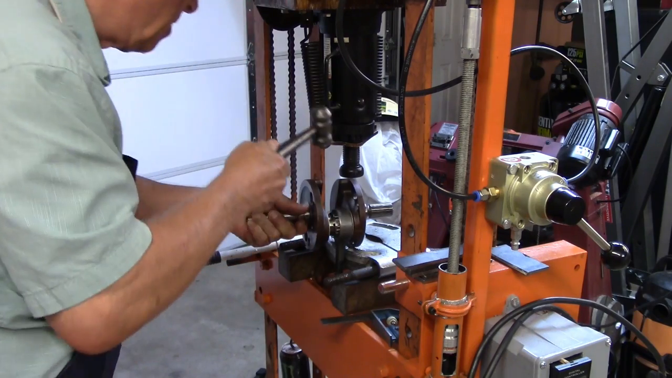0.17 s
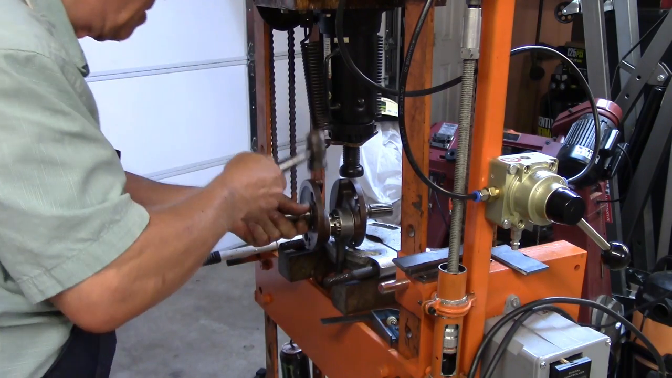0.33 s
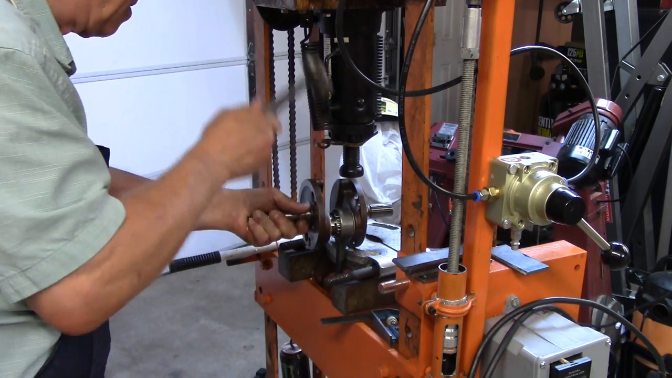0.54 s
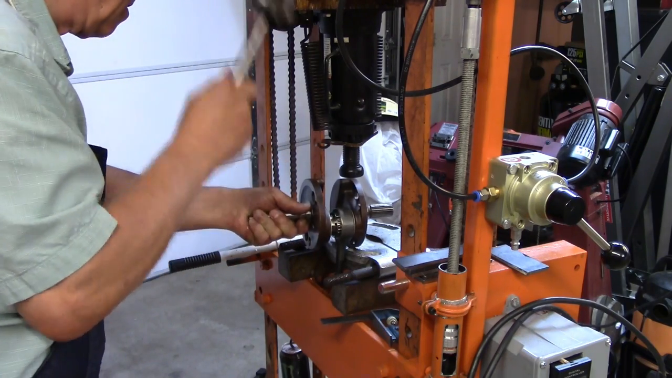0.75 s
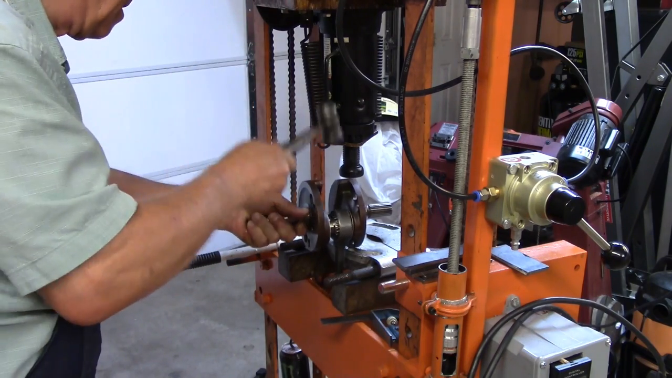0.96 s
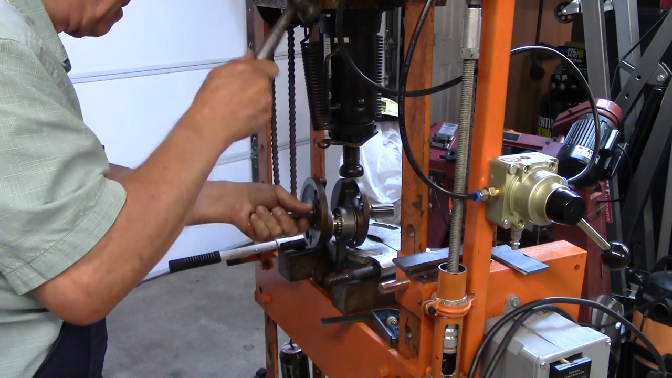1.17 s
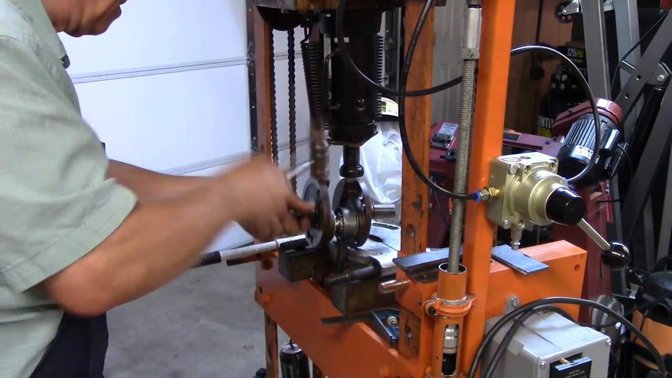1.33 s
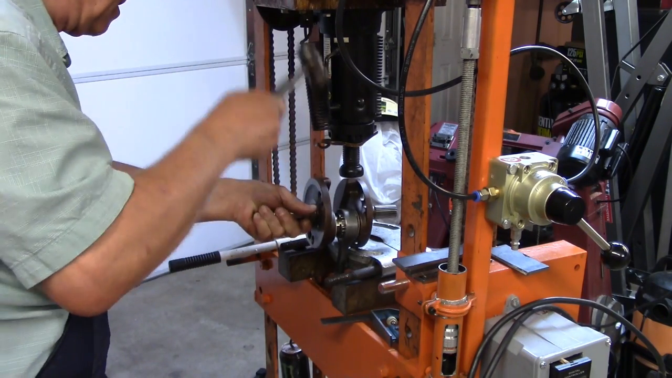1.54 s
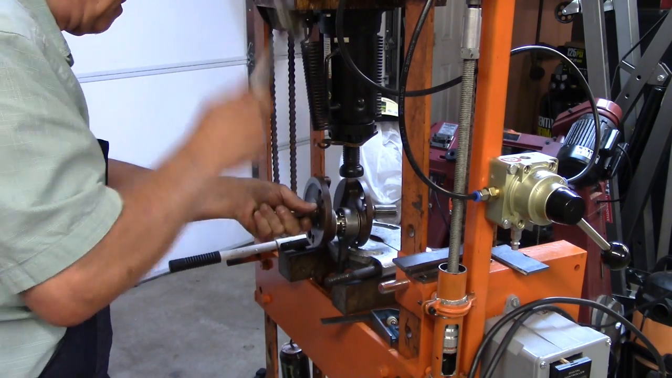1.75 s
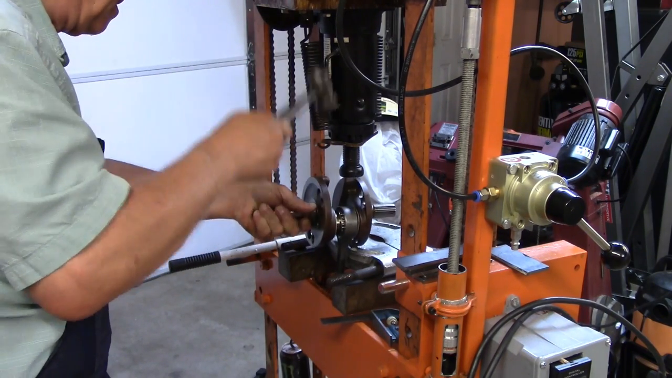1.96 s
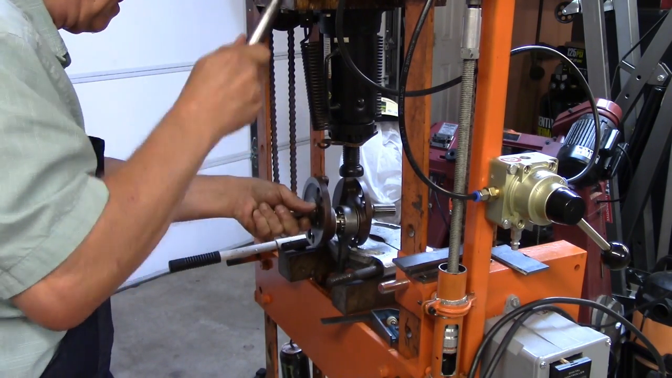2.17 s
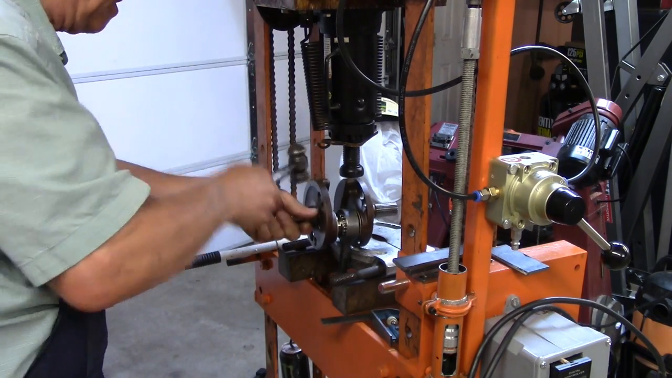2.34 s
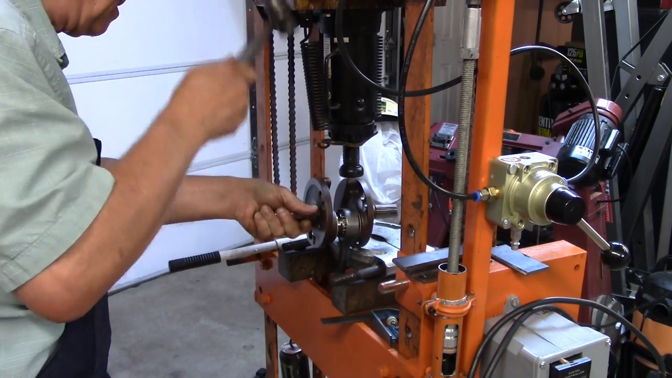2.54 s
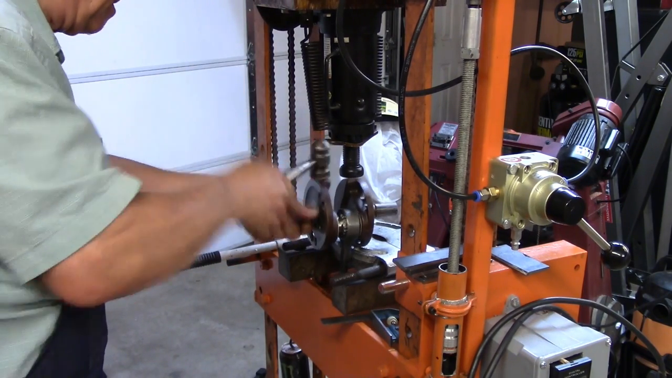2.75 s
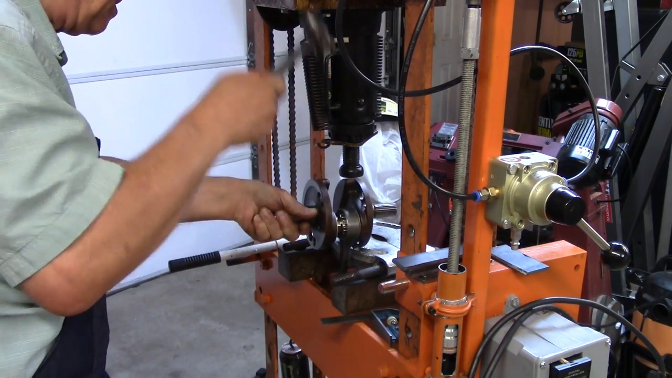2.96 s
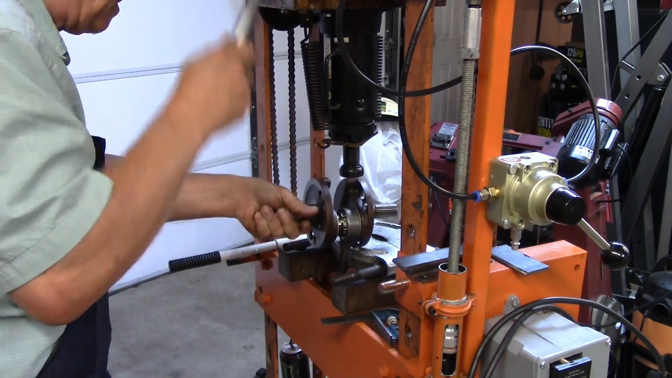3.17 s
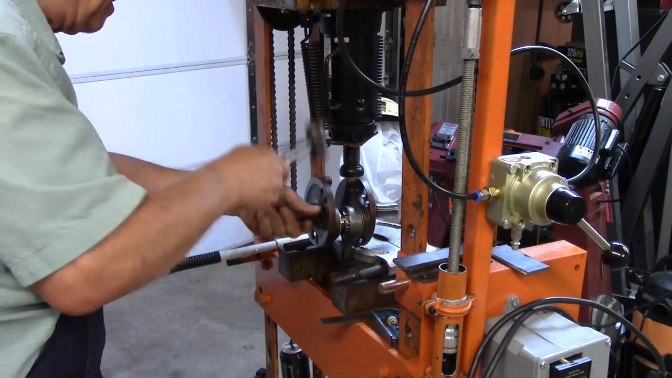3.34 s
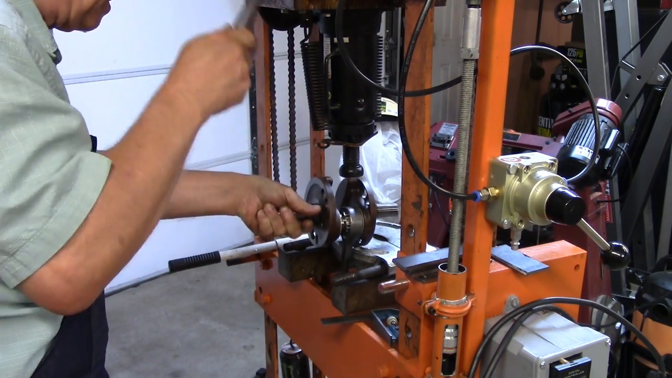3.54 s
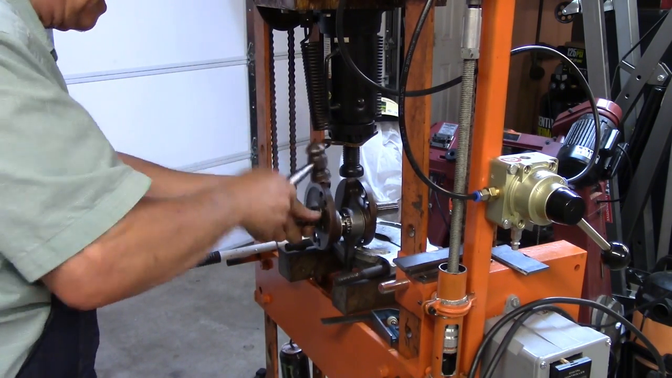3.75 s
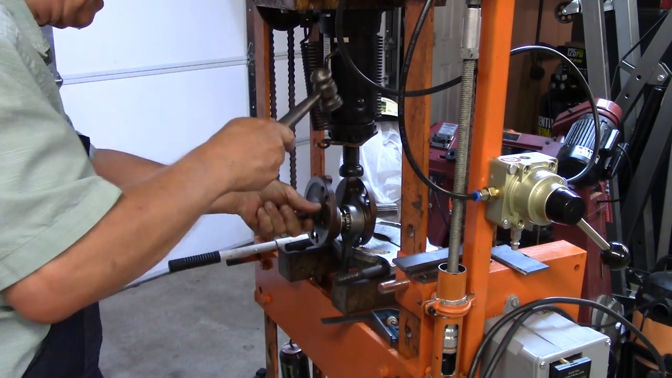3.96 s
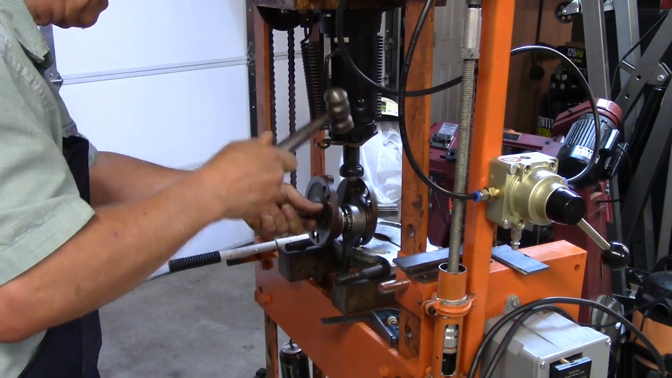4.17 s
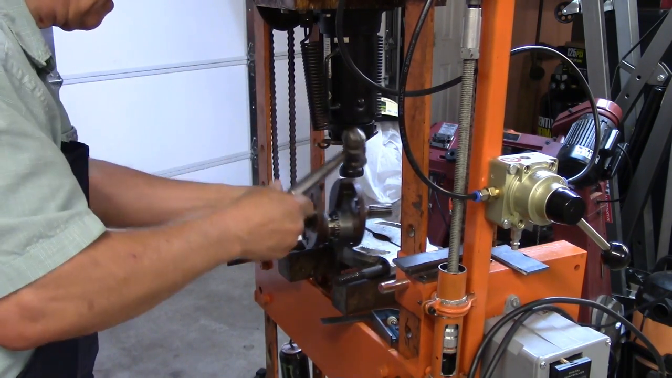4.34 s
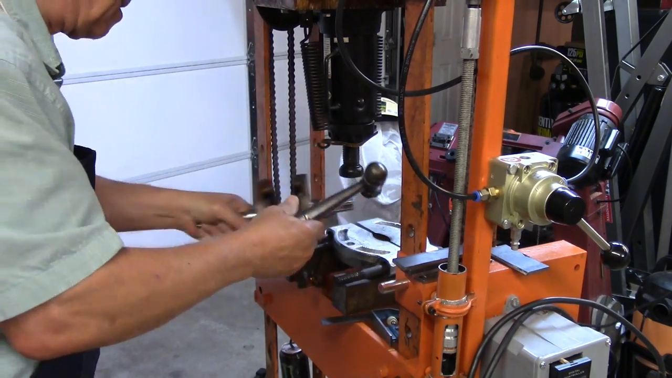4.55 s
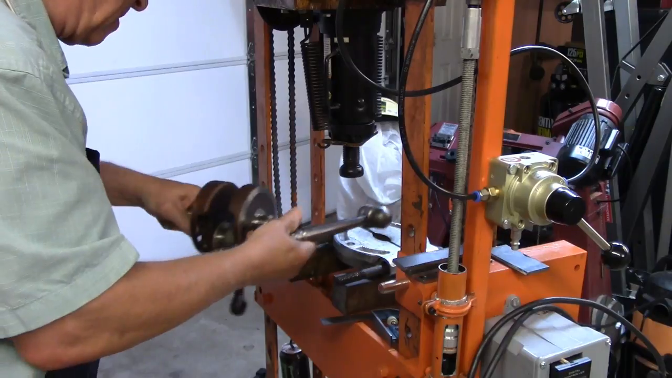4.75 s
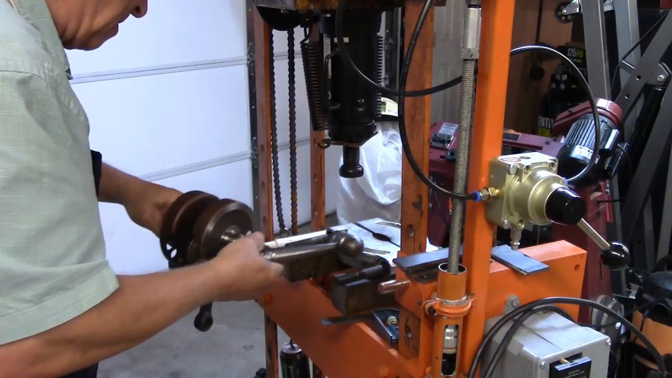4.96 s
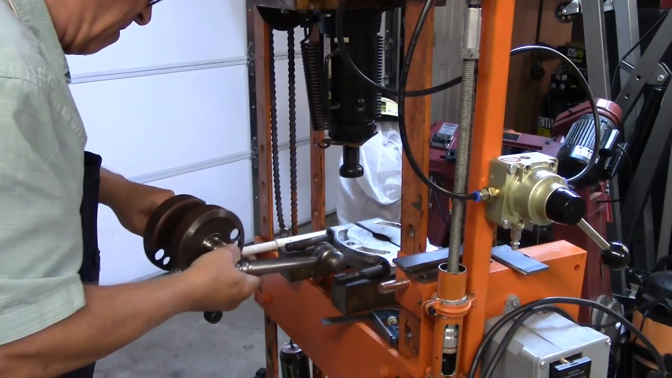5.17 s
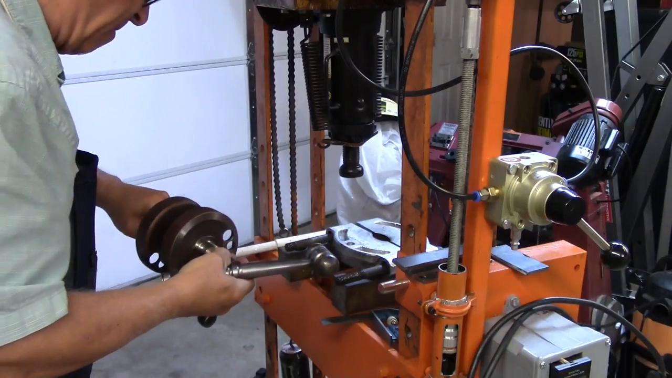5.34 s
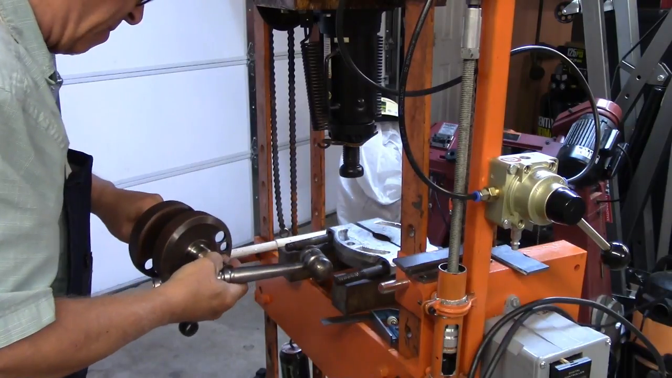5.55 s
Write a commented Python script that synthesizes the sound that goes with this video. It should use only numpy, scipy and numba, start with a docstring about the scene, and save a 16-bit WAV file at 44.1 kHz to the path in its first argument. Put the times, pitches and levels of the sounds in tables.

```python
"""A motor and its fan drone in a garage, made from coloured noise and wavering low tones.
A steel hammer taps a flywheel held in a press, bounces once, then strikes it seven full blows.
Each contact is a noise burst plus ringing steel, which the walls throw back for about half a second.
Later steel slides off the press with a faint hiss of noise, and the lifted parts clink.
A camera's gain control reacts a few milliseconds late throughout, so the loud starts can clip."""
import sys
import numpy as np
from scipy import signal
from scipy.fft import rfft, irfft
from scipy.io import wavfile
from scipy.ndimage import uniform_filter1d
from numba import njit

SR = 44100
rng = np.random.default_rng(int(sys.argv[2]) if len(sys.argv) > 2 else 0)


def inscribe(sig):
    """Save sig as 16-bit PCM at rate SR to the path in sys.argv[1].

    A 1-D sig is mono; a 2-D sig holds one channel per row.
    Samples are clipped to [-1, 1] before scaling.
    """
    pcm = np.round(np.clip(np.atleast_2d(sig).T, -1, 1) * 32767)
    wavfile.write(sys.argv[1], SR, pcm.astype(np.int16))


N = 247004  # length in samples

# Colour of the fan noise. Each row: pitch in Hz, relative level in dB per Hz.
FAN_COLOUR = [(20, -49), (42, -26), (60, -11), (80, -28.5), (120, -15.5), (190, -11.5), (250, 0), (350, -3),
              (520, -4), (900, -10.5), (2000, -18.5), (5000, -30), (9000, -39), (15500, -52.5)]
# Low tones of the motor. Each row: pitch in Hz, middle level in dB rms.
MOTOR_TONES = [(57.5, -59), (115, -58), (172, -54.5), (232, -66), (345, -48)]
# Stereo width of the drone. Each row: pitch in Hz, gain of the side signal in dB.
DRONE_WIDTH = [(60, -16.5), (180, -19), (550, -22.5), (1650, -17.5), (4970, -13.5), (15000, -8)]
# Light aiming tap and its bounce. Each row: start in seconds, strength in dB.
TAPS = [(0.4478, -3.5), (.4790, -11.5)]
# Full blows. Each row: start in seconds, strength in dB, landing spot from 0 (flat of the shaft) to 1 (near the rim).
BLOWS = [(.9270, 15, 0.037), (1.4240, 14.5, 0.026), (1.9043, 16, 0.55), (2.3743, 16, 0.87),
         (2.8510, 15.5, 0.25), (3.3343, 16, 0.71), (3.8128, 16.5, 0.83)]
# The lifted parts touch. The one row: start in seconds, strength in dB.
CLINK = (4.9795, -17.5)
# Ringing of flywheel, shaft and hammer, in groups that a blow excites together.
# Each row in a group: pitch in Hz, relative level in dB, time to fall by 60 dB in seconds.
RING_GROUPS = [
    [(1055, -10, .2)],
    [(1540, -9, .18), (1612, -10, .15), (1810, -6, .08), (1890, -8, .12)],
    [(3002, -3, .3), (3072, -9, .2)],
    [(2800, -11, .15), (3600, -3, .15), (3630, -4, .13), (3696, -3, .24), (3735, -3, .12), (3785, -2, .2),
     (3830, -4, .15)],
    [(4050, -7, .13), (4103, -3, .28), (4137, -4, .3)],
    [(4958, -6, .6)],
    [(5239, -8, .33)],
    [(5514, -8, .12), (5600, -7, .18), (5880, -10, .22), (6015, -9, .15)],
    [(6590, -10, .22), (6800, -12, .15), (11130, -21, .2), (11300, -21, .22)],
    [(7180, -17, .2), (7965, -16, .2), (8470, -16, .25), (8487, -17, .33), (9990, -18, .2)],
    [(11502, -16, .3), (12600, -23, .2), (13250, -28, .15), (13506, -22, .18), (14290, -24, .1)],
    [(11740, -24, .4), (13628, -32, 1.5)],
]
# How strongly the ring groups answer each kind of contact. Each entry: gain of one group in dB, in group order.
ON_FLAT = [-9.5, -7.5, -18, 1, -10.5, -10.5, 1, -9, -31, -2, 9.5, -10.5]
NEAR_RIM = [-7.5, -4.5, -3.5, -2, 0, 2.5, -0.5, -0.5, 4, 2, -1, -2.5]
TAPPED = [-4, -1.5, -27, -8.5, 2, -6, -5, -12, 3, -12, -11, -17]
CLINKED = [10.5, 4, -26, -27, -45, -33, -6, -28, -7, -4, -9, -32]
# Colour of the contact burst. Each row: pitch in Hz, relative level in dB per Hz.
CRACK_COLOUR = [(180, -52), (300, -19.5), (450, -14), (700, -14), (1050, -10), (1700, -2), (2400, -2.5),
                (3300, 1), (4500, -4), (5400, 1.5), (7500, -6), (11500, -9), (13800, -21.5), (15800, -22.5)]
# Echo of the garage. Each row: pitch in Hz, time to fall by 60 dB in seconds.
GARAGE_DECAY = [(150, 0.58), (700, 0.47), (2000, 0.46), (4000, 0.46), (8000, 0.41), (15000, 0.23)]
# Stereo width of contacts and scrape. Each row: pitch in Hz, gain of the side signal in dB.
CONTACT_WIDTH = [(60, -15), (130, -18), (290, -30), (640, -23), (1410, -35.5), (3100, -16.5), (6820, -12.5),
                 (15000, -16.5)]
# Steel slides off the press. Each row: time in seconds, level in dB.
SCRAPE_LEVEL = [(4.45, -80), (4.6, -56), (4.72, -55), (4.85, -62), (4.95, -71)]

DRONE_DB = -38.5  # fan noise level, before its swells
# below HARD_DB, each dB lost dulls the contact above DULL_FROM_HZ
HARD_DB, DULL_DB_PER_OCTAVE, DULL_FROM_HZ = 1, 0.37, 580
ROOM_DB, CLINK_ROOM_DB = 2.14, 0  # the hand-held parts send less to the walls
CLANG_DB, CLINK_CLANG_DB = -8.0, -17  # loose parts hardly clang
EDGE_HZ = 15900  # upper limit of the final sound


def amp(db):
    """Turns dB into a plain multiplier."""
    return 10 ** (np.asarray(db) / 20)


def evened(x):
    """Scales x to an rms of 1."""
    return x / np.sqrt(np.mean(x ** 2) + 1e-20)


def read(points, hz):
    """Reads a table between its rows, along a logarithmic pitch scale."""
    f, value = np.transpose(points)
    return np.interp(np.log(hz + 1), np.log(f + 1), value)


def coloured(x, db_of):
    """Filters x by a gain in dB given as a function of frequency."""
    hz = np.fft.rfftfreq(x.shape[-1], 1 / SR)
    return irfft(rfft(x) * amp(db_of(hz)), x.shape[-1])


def wander(hz):
    """Random curve of rms 1, made of noise kept mostly below hz."""
    noise = rng.standard_normal(N)
    return evened(coloured(noise, lambda f: -40 * np.log10(1 + (f / hz) ** 2)))


def left_right(mid, side, width):
    """Sets the side signal's level by pitch, then makes left and right as mid plus and minus side."""
    side = coloured(side, lambda hz: read(width, hz))
    return np.array([mid + side, mid - side])


def drone(swell_db=.4, flutter_db=1.2, waver=.006):
    """Fan noise that swells and flutters slightly, and motor tones that waver together in pitch."""
    air = coloured(rng.standard_normal((2, N)), lambda hz: read(FAN_COLOUR, hz))
    level_db = DRONE_DB + swell_db * wander(0.83) + flutter_db * wander(30)
    air *= amp(level_db) / air[0].std()
    turns = np.cumsum(1 + waver * wander(3.6)) / SR
    for hz, db in MOTOR_TONES:
        tone = np.sin(2 * np.pi * (hz * turns + rng.random()))
        air[0] += np.sqrt(2) * amp(db + 2.65 * wander(5.4)) * tone
    return left_right(*air, DRONE_WIDTH)


def strikes():
    """Lists every contact as (start in s, strength dB, room dB, clang dB, answers of the ring groups)."""
    flat, rim = np.array(ON_FLAT), np.array(NEAR_RIM)
    taps = [(s, db, ROOM_DB, CLANG_DB, TAPPED) for s, db in TAPS]
    # the landing spot blends the two ways the steel can answer
    blows = [(s, db, ROOM_DB, CLANG_DB, flat + spot * (rim - flat)) for s, db, spot in BLOWS]
    clink = (*CLINK, CLINK_ROOM_DB, CLINK_CLANG_DB, CLINKED)
    return taps + blows + [clink]


def contact_noise(t, db, crack_t60=0.034, soft=0.38):
    """The crack of steel on steel: a noise burst that is shorter and duller for a light contact."""
    # crack_t60 is the time to fall by 60 dB, in seconds, at a strength of 18 dB
    fall_s = crack_t60 * amp(soft * (db - 18.0))
    burst = rng.standard_normal(len(t)) * amp(-60 * t / fall_s)
    # the burst keeps its scattered phases but has the smooth spectrum of a hard contact
    bumps = uniform_filter1d(abs(rfft(burst)), size=45)
    flat = irfft(rfft(burst) / bumps, len(t))
    tilt = DULL_DB_PER_OCTAVE * min(db - HARD_DB, 0)

    def colour(hz):
        """The contact's colour, tilted down at the top if it is light."""
        octaves_up = np.log2(np.maximum(hz, DULL_FROM_HZ) / DULL_FROM_HZ)
        return read(CRACK_COLOUR, hz) + tilt * octaves_up

    crack = coloured(flat, colour)
    fade = np.clip(2 - t / .06, 0, 1)  # full for 60 ms, gone at 120 ms
    return crack * fade * np.linalg.norm(burst) / np.linalg.norm(crack)


def blow(db, clang_db, answers, rings_db=-15.0, clang_share=0.21):
    """A burst of contact noise with a short clang, and the longer ringing of the steel as fading sines."""
    t = np.arange(int(1.5 * SR)) / SR
    crack = contact_noise(t, db)
    modes = [(hz, answer_db + mode_db, t60)
             for group, answer_db in zip(RING_GROUPS, answers)
             for hz, mode_db, t60 in group]
    hz, level_db, t60 = np.array(modes).T[..., None]
    tones = np.sin(2 * np.pi * (hz * t + rng.random(hz.shape)))
    ring = (amp(rings_db + level_db - 60 * t / t60) * tones).sum(0)
    # the clamped steel first clangs loudly, and the press damps that within a share of the ring time
    short = len(t) // 4
    clang_level = amp(clang_db + level_db - 60 * t[:short] / (clang_share * t60))
    crack[:short] += (clang_level * tones[:, :short]).sum(0)
    # a start of 0.24 ms and a closing fade of half a second
    edges = np.clip(np.minimum(t / 0.00024, (t[-1] - t) / .5), 0, 1)
    return crack * amp(db) * edges, ring * amp(db) * edges


def garage(x, gap=0.0011, rise=0.006):
    """Dense reflections that build up (gap and rise in s), then die band by band; returns mid and side."""
    hz, t, z = signal.stft(rng.standard_normal((2, SR)), SR, nperseg=256)
    decay = amp(-60 * t / read(GARAGE_DECAY, hz)[:, None])
    tail = signal.istft(z * decay, SR, nperseg=256)[1]
    tail_s = np.arange(tail.shape[1]) / SR
    tail *= np.clip((tail_s - gap) / rise, 0, 1)
    return signal.fftconvolve(x[None], tail / np.linalg.norm(tail[0]), axes=1)


def hammer(ring_wet_db=-12.0, direct_side_db=-10.5):
    """All contacts, each with a direct sound and a dense, randomly drawn garage echo."""
    out = np.zeros((2, N + 3 * SR))
    for s, db, room_db, clang_db, answers in strikes():
        crack, ring = blow(db, clang_db, answers)
        direct = crack + ring
        sound = amp(room_db) * garage(crack + amp(ring_wet_db) * ring)
        sound[0, :len(direct)] += direct
        sound[1, :len(direct)] += amp(direct_side_db) * np.roll(direct, 3)  # 3 samples later
        at = round(s * SR)
        out[:, at:at + sound.shape[1]] += sound
    return left_right(*out[:, :N], CONTACT_WIDTH)


def scrape(centre_hz=3800, octaves=0.19):
    """Steel sliding off the press: a faint rubbing hiss around one broad resonance."""
    noise = rng.standard_normal((2, N))
    hiss = coloured(noise, lambda hz: -6 * (np.log2((hz + 20) / centre_hz) / octaves) ** 2)
    s, db = np.transpose(SCRAPE_LEVEL)
    level = amp(np.interp(np.arange(N) / SR, s, db, -120, -120))
    return left_right(*(evened(hiss) * level), CONTACT_WIDTH)


def scene():
    """Adds up the drone, the hammer and clink, and the scrape."""
    return drone() + hammer() + scrape()


@njit
def follow(x, up, down):
    """Level detector that rises and falls at its own speeds."""
    out, level = np.empty_like(x), 0.0
    for i in range(len(x)):
        level += (up if x[i] > level else down) * (x[i] - level)
        out[i] = level
    return out


def record(dry, attack=0.0037, release=0.013, knee_db=-9.5, low_hz=40):
    """Gain control that lags the blow (attack and release in s), clipping, bass cut and treble limit."""
    level = follow(abs(dry).max(0), 1 / (attack * SR), 1 / (release * SR))
    # all of the detected level above the knee is taken away
    over_db = np.maximum(20 * np.log10(level + 1e-9) - knee_db, 0)
    held = np.clip(dry / amp(over_db), -.93, .93)
    bass_cut = signal.butter(2, low_hz, "high", fs=SR, output="sos")
    held = signal.sosfilt(bass_cut, held)
    treble_limit = signal.firwin(511, EDGE_HZ, window=("kaiser", 9), fs=SR)
    return signal.oaconvolve(held, treble_limit[None], "same")


dry = scene()
out = record(dry)
inscribe(out)
```